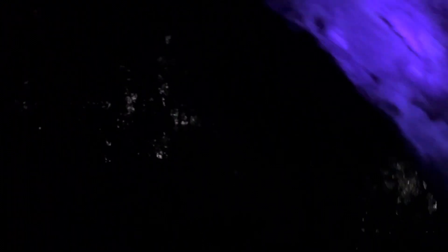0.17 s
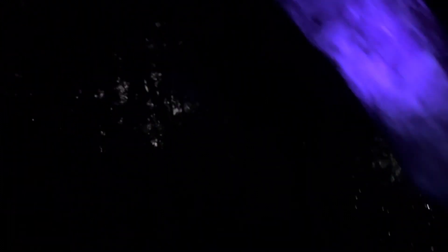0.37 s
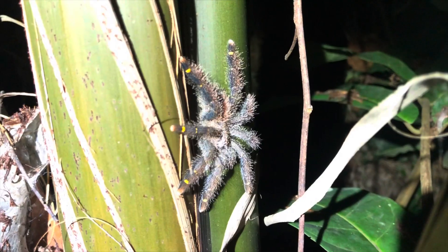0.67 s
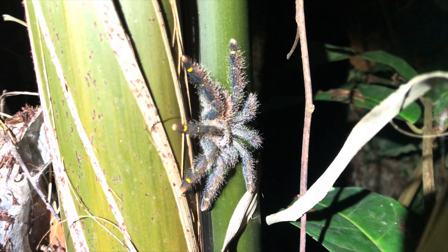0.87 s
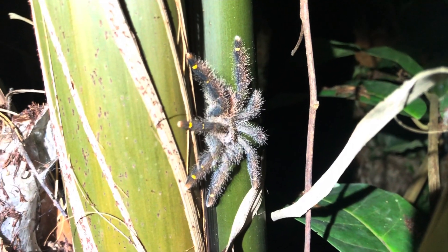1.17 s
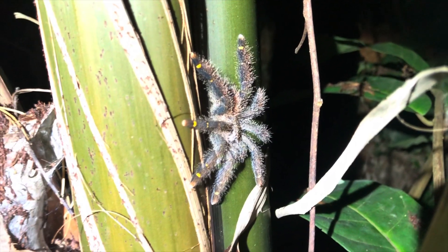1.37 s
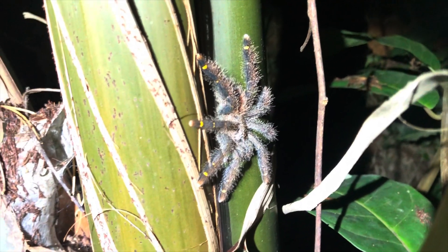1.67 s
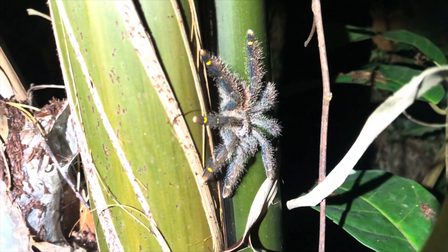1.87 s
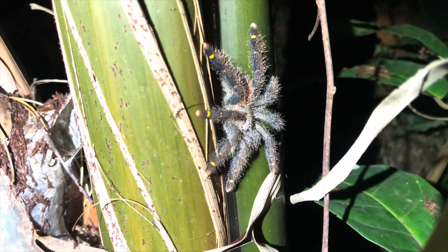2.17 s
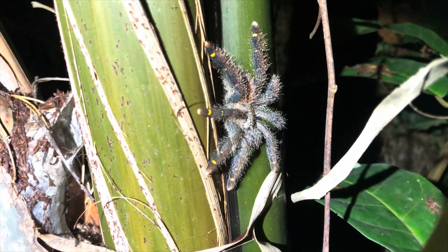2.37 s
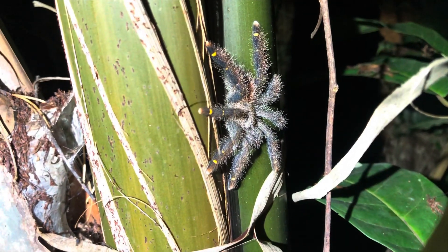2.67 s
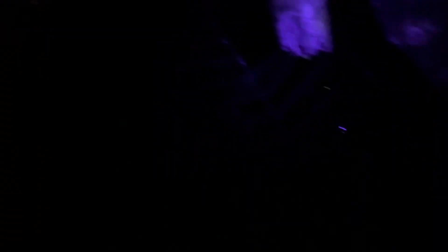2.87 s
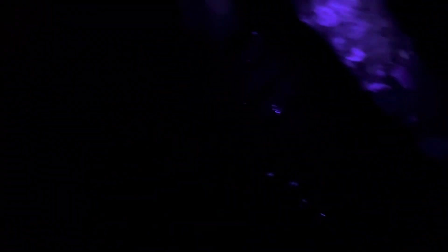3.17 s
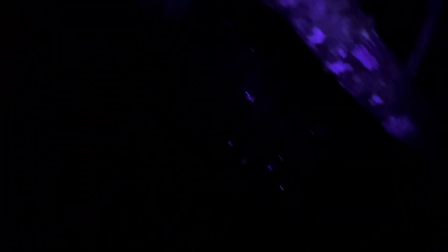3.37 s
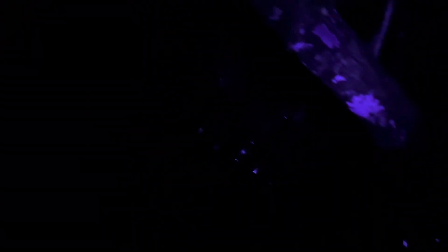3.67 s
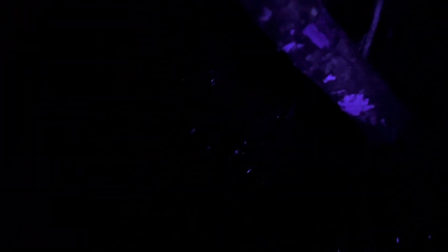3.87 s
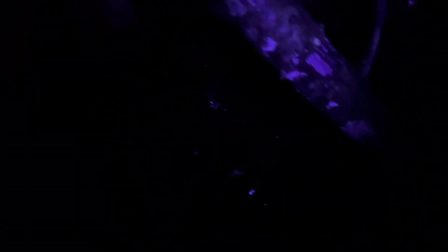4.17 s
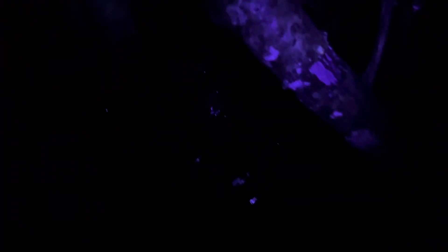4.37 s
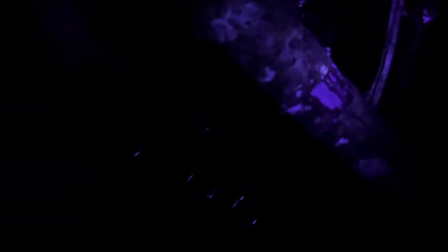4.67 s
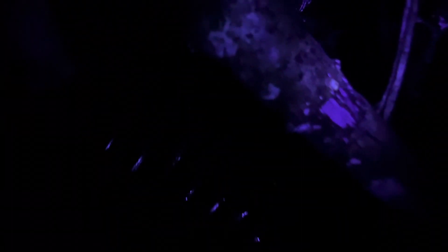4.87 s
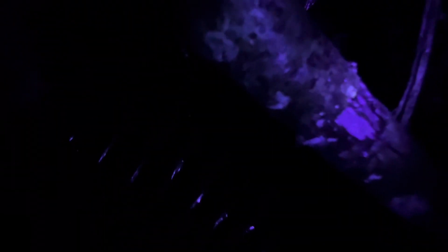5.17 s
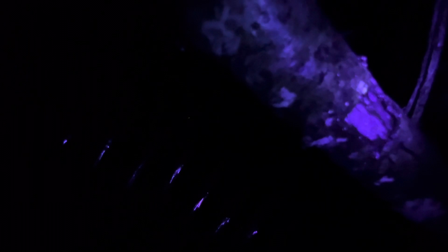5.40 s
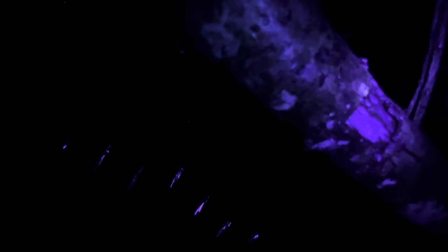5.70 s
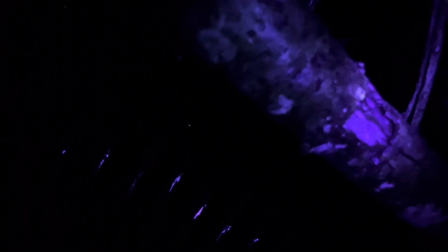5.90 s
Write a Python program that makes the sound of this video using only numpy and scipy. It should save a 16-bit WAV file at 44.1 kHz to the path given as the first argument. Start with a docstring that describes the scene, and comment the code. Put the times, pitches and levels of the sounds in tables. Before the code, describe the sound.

Outdoors in a dark forest, even rain hisses around a close stereo microphone pair. Over it come fine drips, short flurries as leaves shed water, dull woody taps and sharp little cracks with a brief spray, clustering just before two seconds and again past four. Beneath, a remote generator throbs low and steady, while thin crickets pulse faintly and pause.

```python
"""Night rain on forest foliage, heard by a close pair of microphones.
From the start: far rain as banded noise, nearer patter as noise splats, tiny drips as short rings;
a distant generator drones as a sum of sines; faint crickets trill as pulsed sines, on and off.
Soon after, brief flurries swell the rain and single drops tap broad leaves (sagging knocks);
then ticks join from drops bursting on hard leaves (cracks with spray)."""
import sys
import numpy as np
from scipy import signal
from scipy.fft import rfft, irfft, next_fast_len
from scipy.io import wavfile
from scipy.ndimage import uniform_filter1d

SR = 44100
rng = np.random.default_rng(int(sys.argv[2]) if len(sys.argv) > 2 else 0)


def to_wav(sig):
    """Store sig (one row per channel, or 1-D mono) as 16-bit WAV at the path in sys.argv[1].

    Samples outside -1..1 are clipped; the rate is SR.
    """
    pcm = np.clip(np.atleast_2d(sig), -1, 1) * 32767
    pcm = np.round(pcm).astype(np.int16)
    wavfile.write(sys.argv[1], SR, pcm.T)  # frames by channels


N = 266275
T = np.arange(N) / SR
SIZE = next_fast_len(N)
HZ = np.maximum(np.arange(SIZE // 2 + 1) * SR / SIZE, 1.)

# slow drift of the rain: time_s, swell_db
SHOWER_DRIFT = [(0, 0), (.8, -0.16), (1.1, -0.4), (1.65, 0.3), (1.9, -2), (2.7, -1.5), (3.5, -1.5),
                (4.3, -1.5), (4.5, -0.5), (6.04, -1)]
# brief swells as a leaf sheds its water: middle_s, swell_db, half_length_s (to 1/e)
LEAF_FLURRIES = [(0.363, 1.5, 0.022), (0.828, 2, 0.1), (1.741, 5.5, 0.013), (1.89, 4, 0.056),
                 (2.18, 3, 0.068), (2.878, 4, 0.033), (3.455, 2, 0.035), (3.707, 4.5, 0.028),
                 (4.379, 2, 0.029), (5.753, 6.5, 0.012)]
# rain colour, relative: frequency_hz, density_db_per_hz
RAIN_COLOUR = [(28, -21), (45, 2.5), (60, 1.5), (110, -1), (200, -5.5), (300, -9), (370, -10.5), (480, -14),
               (620, -10.5), (850, -14.5), (2000, -14.5), (2700, -16.5), (3300, -20), (4400, -18.5),
               (7000, -21.5), (11000, -23), (16000, -33)]
# likeness of left and right rain: frequency_hz, likeness (0-1; clipped)
RAIN_LIKENESS = [(100, 0.89), (300, 0.82), (600, 0.56), (950, 0.23), (1300, 0.54), (1800, 0.07),
                 (2100, 0.48), (4500, 0.33), (5500, 0.39), (7000, 0.099), (8200, 1), (16000, 1)]
# direction of the rain by band: frequency_hz, left_lead_rad
RAIN_LEFT_LEAD = [(150, 0), (430, -.2), (900, 1.3), (1200, 0), (1600, -2), (2000, -.2), (3100, 1),
                  (6000, .3), (7200, .8), (8500, 0)]
# generator partials: multiple (of the cycle rate), level_db (rms before wander)
ENGINE_PARTIALS = [(2, -66), (3, -47.5), (4, -48), (5, -50), (6, -40.5), (7, -45.5), (8, -46), (9, -51),
                   (10, -47), (11, -51), (12, -44.5), (13, -49), (14, -49.5), (15, -61), (16, -59.5),
                   (17, -60.5), (18, -60), (19, -64.5)]
# phase pattern of the partials: delay_cycles, gain
PARTIAL_PHASING = [(0.2703, 0.85), (0.8848, 0.39)]
# crickets: start_s, end_s, pitch_hz, modulation_hz, depth (0-1), level_db (peak before wander)
CRICKET_TRILLS = [(.2, .4, 4400, 30, 1, -58), (0, 2.7, 3992, 41, .3, -61), (1.68, 2.32, 4520, 30, 1, -54),
                  (3.1, 4.1, 4033, 41, .3, -61.5), (4.45, 5.2, 4500, 30, 1, -54),
                  (4.55, 6, 4033, 41, .3, -60), (4.8, 5.2, 4189, 30, .3, -62), (0, 6, 4189, 30, .3, -65.5)]
# drops on broad leaves: start_s, knock_peak_db, pitch_hz (at the peak), left_minus_right_db,
# rise_cycles (at least .3), fade_cycles (by 9 dB; at least .4)
LEAF_TAPS = [(.2456, -32, 1150, -7, 1.5, 1), (.3809, -29, 2150, -4, .9, 3), (.3812, -33, 1300, -4, .6, 1.2),
             (.4563, -36, 1080, 2, .8, 1), (.7885, -32, 2060, -3, 1, 2.5),
             (1.0912, -24.5, 1480, -6, .5, 1.6), (1.4168, -35, 1200, -1, .6, 1),
             (1.7287, -33, 1900, 0, .8, 2), (1.7379, -27, 2150, 4, 1, 2.5), (1.7398, -32, 2700, 2, 1, 4),
             (1.8714, -34, 900, 0, .5, 1.2), (2.1436, -29.5, 950, -1, .6, .8),
             (2.1441, -31, 2000, -1, .8, 2.5), (2.2088, -26.5, 1250, -3, .6, .7),
             (2.2105, -35, 2700, -3, 1, 4), (2.399, -33, 2230, -3, .8, 2.5), (2.8626, -33, 780, 10, .9, 1),
             (2.8635, -28.5, 300, 1, 1.4, 1.2), (2.8906, -35, 1200, -1.5, .6, 1.5),
             (3.1827, -33, 950, -.5, .8, .8), (3.7774, -32, 1020, -.5, .5, 1.5),
             (4.268, -30.5, 1900, 5, 2, 2), (4.2694, -25.5, 1300, 5, .7, .9), (4.2712, -33, 620, 5, .6, .8),
             (4.372, -36, 2200, 0, 1, 2), (4.3845, -33, 3300, 2, 1, 3), (4.386, -31, 1300, 2, .6, 1),
             (4.3885, -32, 2300, 2, 1, 2.5), (4.4078, -31, 750, -4, .8, 1.2), (5.318, -34, 800, 2, .8, 1.2),
             (5.3452, -33, 1940, -.5, 1.2, 2.5)]
# drops on hard leaves: start_s, crack_peak_db, centre_hz, left_minus_right_db, width_octaves (at least .2)
LEAF_TICKS = [(0.71, -30, 4500, -2, 1.4), (0.8874, -34, 7500, -9, 0.72), (1.4167, -22, 6500, -1, 1.9),
              (1.475, -27, 9000, .5, 2.0), (1.7374, -20, 8400, 0, 0.44), (1.7385, -29, 4020, 2, 0.23),
              (1.7602, -30, 8000, 0, 0.4), (1.8496, -21, 7550, 4, 2.4), (2.113, -29, 7600, 3, 0.58),
              (2.1785, -31, 4000, 0, 1.4), (2.208, -28.5, 4750, 3, 0.76), (2.301, -32, 6130, -2, 1.3),
              (2.402, -29, 3900, -2, 2.2), (2.844, -31, 5500, .5, 1.4), (2.889, -30.5, 5700, .5, 1.4),
              (3.0516, -26, 7700, 3, 0.29), (3.327, -26, 12500, 1, 0.83), (3.461, -27.5, 10000, -3, 1.1),
              (3.645, -30, 15000, 1, .3), (3.7056, -33, 5400, 2, 1.6), (4.362, -28, 10000, -.5, 1.0),
              (4.384, -19.5, 6500, 1, 2.5), (4.3855, -24, 8200, 3, 0.4), (4.3862, -28, 5000, 10, 2),
              (4.3905, -35, 4500, 1, 1.5), (4.448, -27, 7800, .5, 1.1), (4.6142, -23, 12500, 3, 0.73),
              (4.6967, -43, 4030, -.5, 1.2), (4.9641, -33, 6000, -11, 1.7), (5.009, -25.5, 9000, 1, 2.3)]
# microphone pair: frequency_hz, left_lead_rad
MIC_LEFT_LEAD = [(8500, 0), (9300, -1.6), (10250, -3.14), (12100, -6.28), (13850, -9.42), (15600, -12.56)]

HISS_RMS_DB, PATTER_RMS_DB, DRIPS_RMS_DB = -39.5, -48, -50.5
DRIPS_PER_S = 900
CYCLE_HZ = 16.304
FIRING_CYCLES = .3842  # firing moment
SMEAR_CYCLES = -0.00822  # phase lag, times the multiple squared
SAG_PER_FADE = .18  # fall of log pitch over a tap's fade
RUSTLE_RMS_DB = -16.5  # before its decay, re knock peak
GRIT_GAIN = .5  # noise against the snap of a crack
SPRAY_RMS_DB = -13  # before its envelope, re crack peak
CRACK_S = .0011  # centre of a crack after its start
TOP_HZ = 15720
HIT_SAMPLES, DRIP_SAMPLES = 1500, 256


def undb(db):
    """Decibels to gain."""
    return 10 ** (np.asarray(db) / 20)


def level(x, rms_db):
    """Scale to an rms level."""
    return x * undb(rms_db) / np.sqrt(np.mean(x ** 2))


def along(table):
    """Read a (Hz, value) table at every frequency, on a log axis."""
    hz, value = np.transpose(table)
    return np.interp(np.log(HZ), np.log(hz), value)


def shape(x, gain):
    """Filter by a gain for every frequency."""
    return irfft(rfft(x, SIZE) * gain, SIZE)[..., :N]


def lead(pair, table):
    """Shift left and right in phase against each other."""
    half = np.exp(.5j * along(table))
    return shape(pair, np.array([half, half.conj()]))


def walk(rate_hz):
    """Random levels held 1 / rate_hz and slewed twice; spread near 1."""
    hold = int(SR / rate_hz)
    steps = np.repeat(rng.standard_normal(N // hold + 1), hold)
    slewed = uniform_filter1d(uniform_filter1d(steps, hold), hold)
    return 1.32 * slewed[:N]


def bells(low_hz, octaves, count):
    """Overlapping bands, each so many octaves apart, whose powers sum to one."""
    place = np.log2(HZ / low_hz) / octaves
    return [np.cos(np.pi / 2 * np.clip(place - k, -1, 1)) for k in range(count)]


def add(out, start_s, sound, pan_db):
    """Place a short sound between left and right."""
    i = int(start_s * SR)
    panned = sound * undb([[pan_db / 2], [-pan_db / 2]])
    out[:, i:i + len(sound)] += panned[:, :N - i]


def shower():
    """Swell of the rain in dB: a slow drift with brief flurries on top."""
    swell_db = np.interp(T, *np.transpose(SHOWER_DRIFT))
    for middle_s, db, half_s in LEAF_FLURRIES:
        swell_db = swell_db + db * np.exp(-((T - middle_s) / half_s) ** 2)
    return swell_db


def hiss(swell_db):
    """Countless far drops merge into noise; each band swells a little on its own and with the rest."""
    out, noise = 0, rfft(rng.standard_normal((2, N)), SIZE)
    for k, bell in enumerate(bells(49.5, 0.9355, count=10)):
        follow = min(k / 5, 1) * 0.35  # the low rumble does not follow the shower
        band = irfft(noise * bell, SIZE)[:, :N]
        out = out + undb(follow * swell_db + 1.64 * walk(12)) * band
    return out


def patter(swell_db, per_s=60, spread_db=2.5, low_hz=900, longest_s=0.015):
    """Nearer drops: each a short half-octave splat of noise; they bunch where the shower is harder."""
    out, noise = 0, rng.standard_normal((2, N))
    odds = per_s * undb(1.5 * swell_db) / SR  # per sample, in each band and channel
    for k, bell in enumerate(bells(366, 0.56, count=10)):
        chance, drops = rng.random((2, N)) / odds, np.zeros((2, N))
        hit = chance < 1
        drops[hit] = undb(-spread_db * np.log(1.01 - chance[hit]))
        # low splats last longer
        fade = np.exp(-(1 + k / 5) / (longest_s * SR))
        onset = signal.lfilter([1 - fade], [1, -fade ** 4], drops)
        splats = signal.lfilter([1 - fade], [1, -fade], onset)
        band = rfft(splats * noise, SIZE) * bell * HZ / (HZ + low_hz)
        out = out + band / np.linalg.norm(band) * 2 ** (k / 4)
    return irfft(out, SIZE)[:, :N]


def drips(swell_db, low_hz=900, high_hz=9500, spread_db=2.5):
    """Tiny drops, each ringing a few cycles on its own pitch from its own direction."""
    when, pitch, size, way, ring = rng.random((5, int(DRIPS_PER_S * N / SR), 1))
    start = (when * (N - DRIP_SAMPLES)).astype(int)
    hz = low_hz + (high_hz - low_hz) * pitch
    turns = T[:DRIP_SAMPLES] * hz
    gain = undb(swell_db[start] - spread_db * np.log(1.01 - size)) * np.sqrt(hz)
    decay_cycles = 8 * (0.37 + ring)
    envelope = (1 - np.exp(-turns)) * np.exp(-turns / decay_cycles)
    blip = gain * np.sin(2 * np.pi * turns) * envelope
    place = (start + np.arange(DRIP_SAMPLES)).ravel()
    # middle and side shares
    return np.array([np.bincount(place, (blip * share(2 * np.pi * way)).ravel(), N)
                     for share in (np.cos, np.sin)])


def rain():
    """Unrelated rain in the middle and at the sides; their shares set how alike left and right are."""
    colour, swell_db = undb(along(RAIN_COLOUR)), shower()
    alike = np.clip(along(RAIN_LIKENESS), 0, 1)
    wet = level(shape(hiss(swell_db), colour), HISS_RMS_DB)
    wet = wet + level(shape(patter(swell_db), colour), PATTER_RMS_DB)
    wet = wet + level(shape(drips(swell_db), colour), DRIPS_RMS_DB)
    mid, side = shape(wet, np.sqrt([(1 + alike) / 2, (1 - alike) / 2]))
    return lead(np.array([mid + side, mid - side]), RAIN_LEFT_LEAD)


def generator():
    """Steady multiples of an engine's cycle, each wavering slightly in the air on the way."""
    out = 0
    for k, db in ENGINE_PARTIALS:
        # sets how the partials line up, so the drone beats within each cycle
        phasing = 1 + sum(gain * np.exp(-2j * np.pi * k * delay) for delay, gain in PARTIAL_PHASING)
        wander_rad = .016 * k * walk(3) + .14 * walk(9)
        wander_db = 0.056 * k * walk(2.3) + 1.04 * walk(7)
        turns = k * (CYCLE_HZ * T - FIRING_CYCLES) - SMEAR_CYCLES * k ** 2
        tone = np.cos(2 * np.pi * turns + np.angle(phasing) + wander_rad)
        out = out + np.sqrt(2) * undb(db + wander_db) * tone
    return out * undb([[0], [.3]])


def crickets():
    """Each trill is a wavering pitch pulsed by the wing strokes, rough and broken by pauses."""
    out = 0
    for start_s, end_s, hz, stroke_hz, depth, db in CRICKET_TRILLS:
        ramp = np.clip(np.minimum(T - start_s, end_s - T) / 0.08, 0, 1)
        pauses = np.clip(1.3 + walk(12), 0, 1)
        # at full depth it swings through zero: two pulses a cycle
        stroke = 1 - depth + depth * np.cos(2 * np.pi * stroke_hz * T)
        rough = undb(db + 4 * walk(60))
        pitch_hz = hz + (3 + 16 * depth ** 2) * walk(20)
        tone = np.sin(2 * np.pi * np.cumsum(pitch_hz) / SR)
        out = out + rough * ramp * pauses * stroke * tone
    return out * undb([[1.5], [-1.5]])


def taps():
    """A blunt knock: the leaf swings a cycle or two, its pitch sagging a little, then rustles."""
    out, t = np.zeros((2, N)), T[:HIT_SAMPLES]
    for start_s, db, hz, pan_db, rise, fall in LEAF_TAPS:
        rise, fall = max(rise, .3), max(fall, .4)
        after = t * hz - rise  # cycles past the peak
        attack = np.cos(np.pi / 2 * after / rise) ** 2
        swing = np.where(after < 0, attack, np.exp(-after / fall))
        sag = SAG_PER_FADE / fall
        knock = np.cos(2 * np.pi * (1 - np.exp(-sag * after)) / sag) * swing
        band = signal.butter(1, [hz * .6, hz * 1.6], "band", fs=SR, output="sos")
        rustle = level(signal.sosfilt(band, rng.standard_normal(HIT_SAMPLES)), RUSTLE_RMS_DB)
        add(out, start_s, undb(db) * (knock + rustle * np.exp(-t / 0.013)), pan_db)
    return out


def tick_band(centre_hz, span):
    """Band-pass from centre / span to centre * span."""
    edges_hz = [centre_hz / span, min(centre_hz * span, .45 * SR)]
    return signal.butter(2, edges_hz, "band", fs=SR, output="sos")


def ticks():
    """A crack about a millisecond long, then the wider spray of the burst drop."""
    out, t = np.zeros((2, N)), T[:HIT_SAMPLES]
    click = 1. * (np.arange(HIT_SAMPLES) == int(CRACK_S * SR))
    for start_s, db, hz, pan_db, width in LEAF_TICKS:
        noise = rng.standard_normal(HIT_SAMPLES)
        span = 2 ** (max(width, .2) / 2)
        near, wide = tick_band(hz, span), tick_band(hz, 1.6 * span)
        snap = signal.sosfiltfilt(near, click)
        grit = level(signal.sosfilt(near, noise), -3)
        crack = (snap / snap.max() + GRIT_GAIN * grit) * np.exp(-((t - CRACK_S) / .0008) ** 2)
        crack = crack / np.abs(crack).max()
        spray = level(signal.sosfilt(wide, noise), SPRAY_RMS_DB)
        spray = spray * (1 - np.exp(-(t / .0015) ** 2)) * np.exp(-t / .008)
        add(out, start_s, undb(db) * (crack + spray), pan_db)
    return out


def scene():
    """All layers, summed in stereo."""
    return rain() + generator() + crickets() + taps() + ticks()


def record(dry):
    """The two microphones shift in phase against each other in the treble; the top is cut."""
    top_cut = signal.ellip(10, .2, 80, TOP_HZ, fs=SR, output="sos")
    return signal.sosfilt(top_cut, lead(dry, MIC_LEFT_LEAD))


dry = scene()
out = record(dry)
to_wav(out)
```